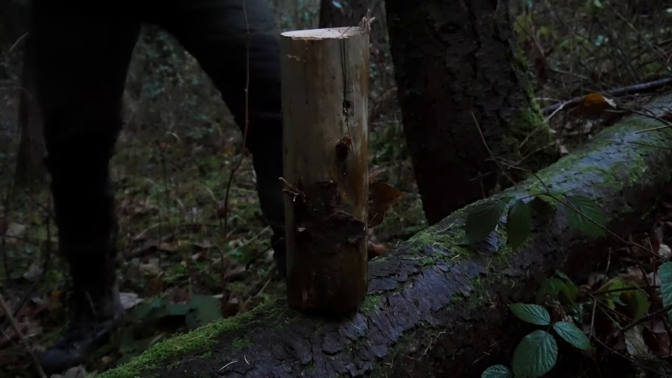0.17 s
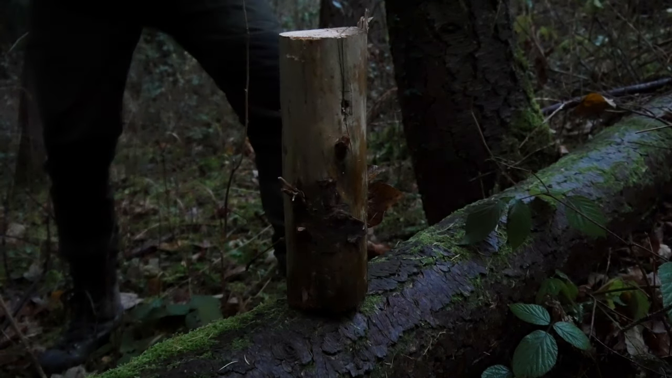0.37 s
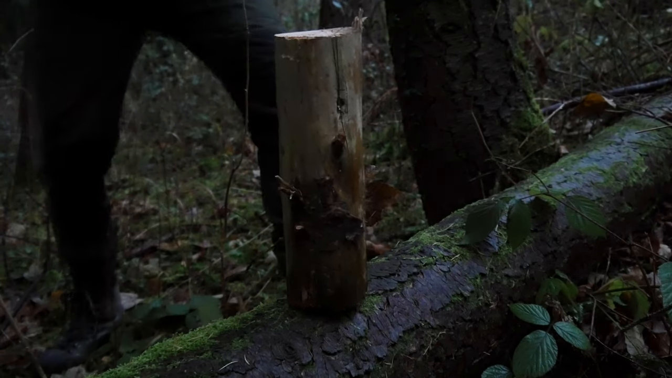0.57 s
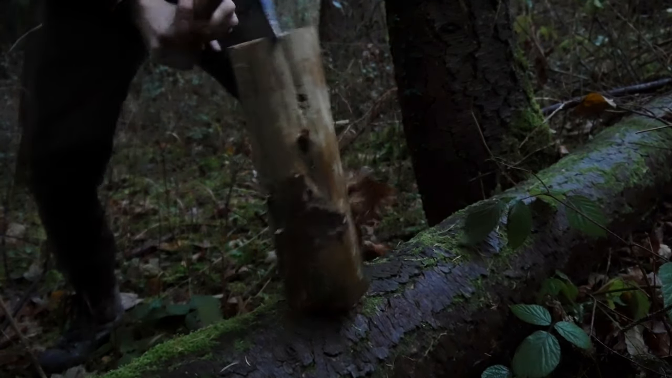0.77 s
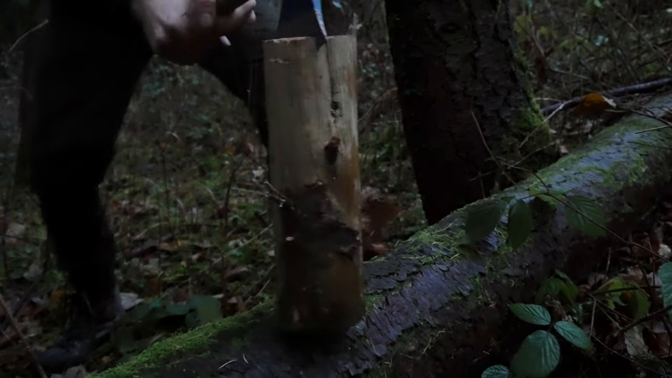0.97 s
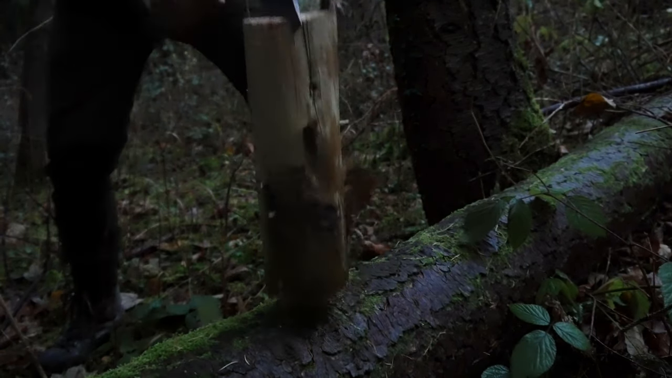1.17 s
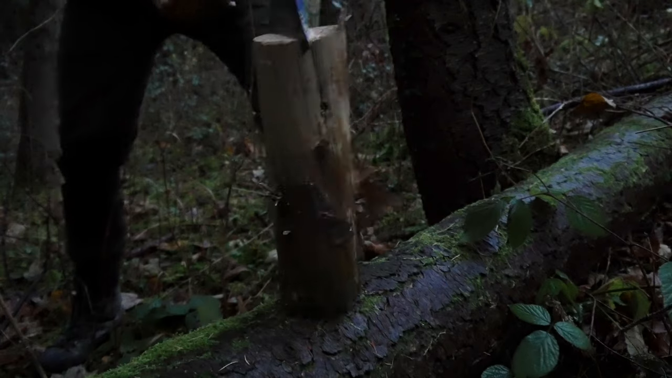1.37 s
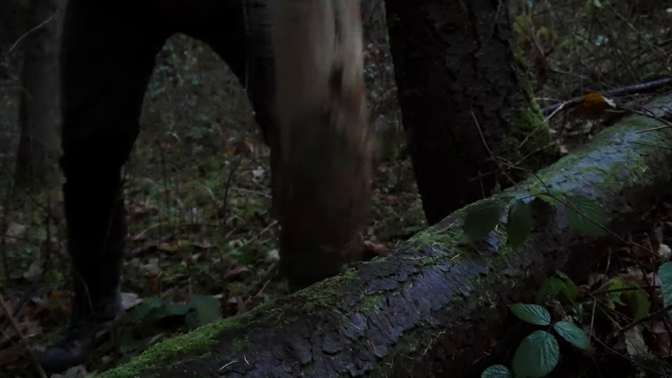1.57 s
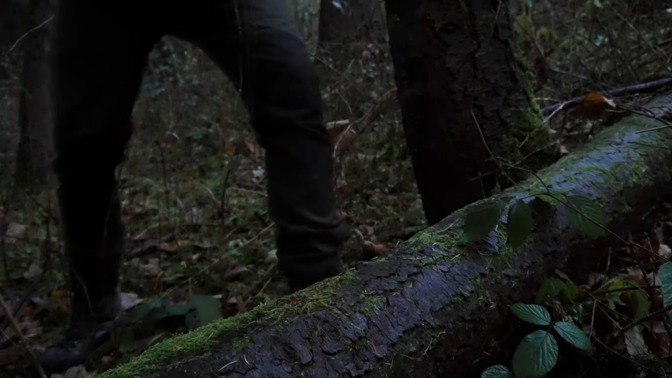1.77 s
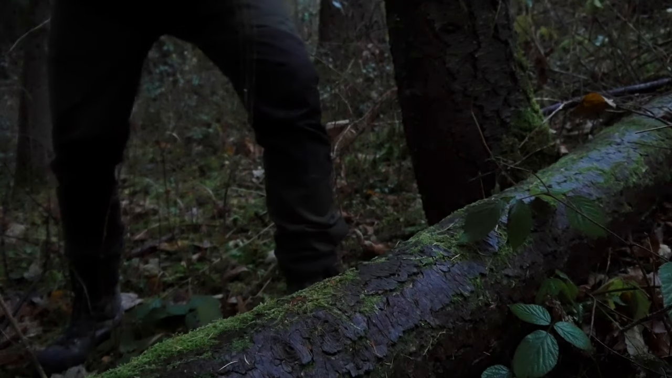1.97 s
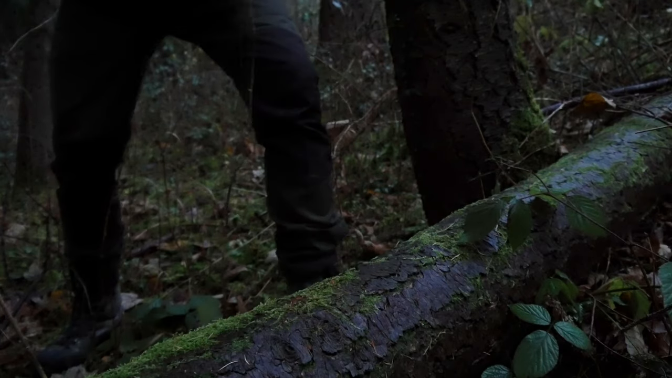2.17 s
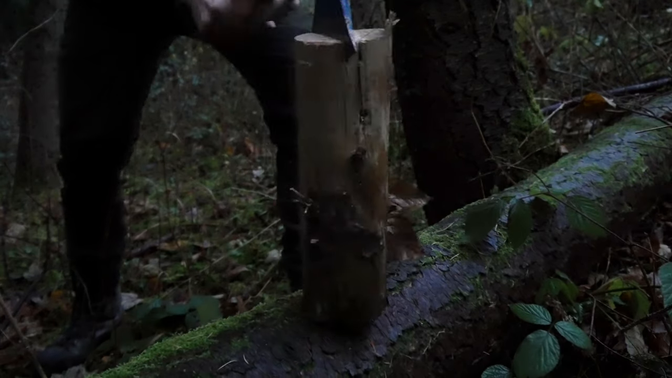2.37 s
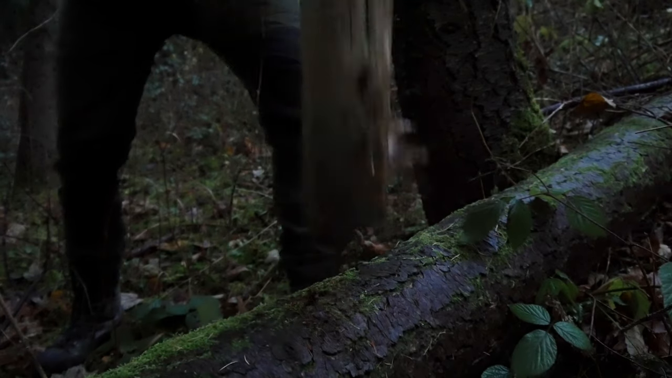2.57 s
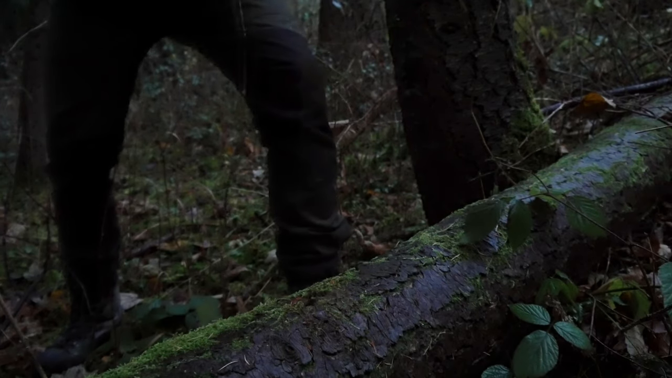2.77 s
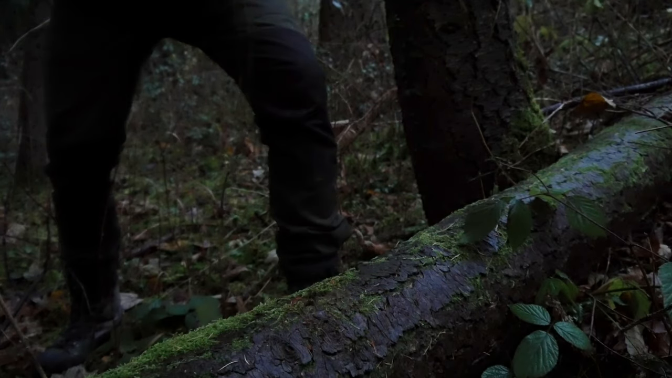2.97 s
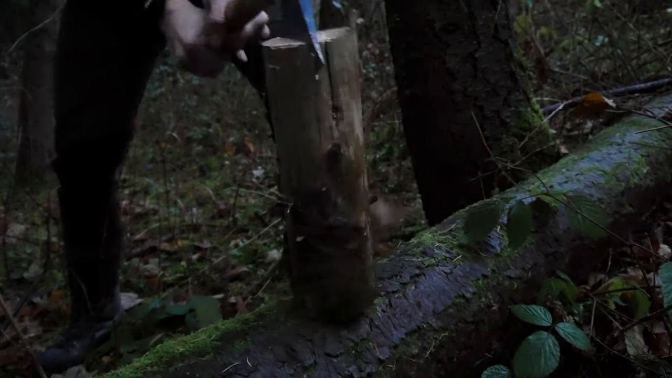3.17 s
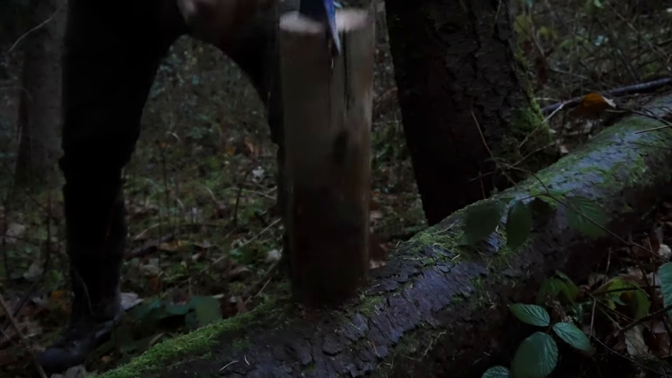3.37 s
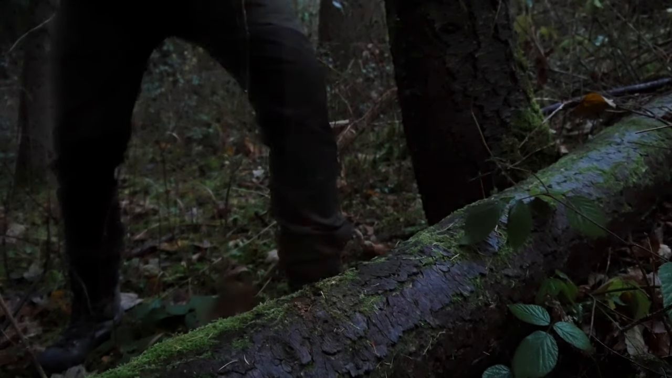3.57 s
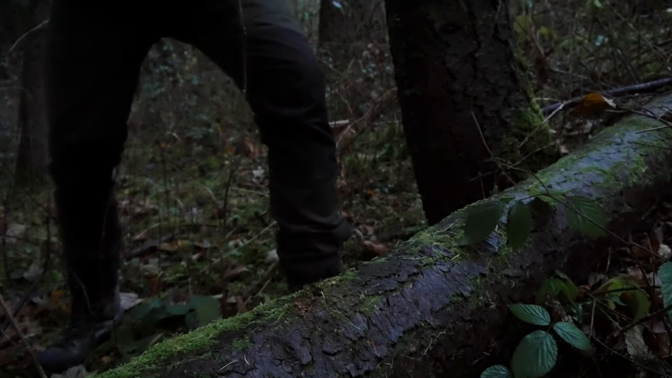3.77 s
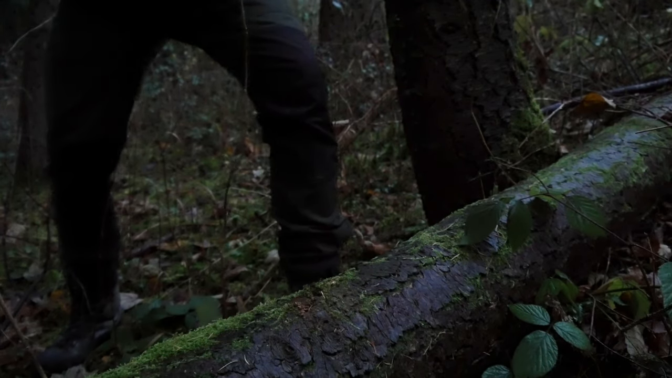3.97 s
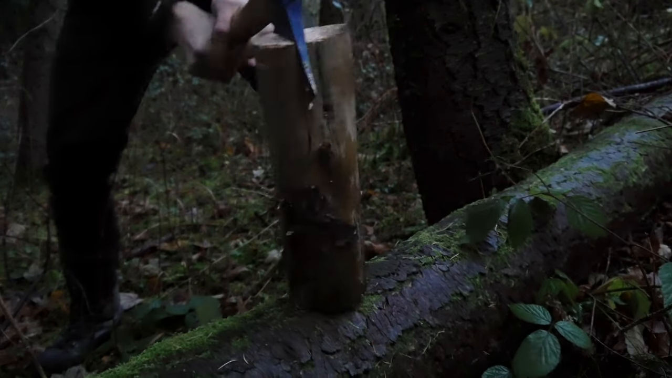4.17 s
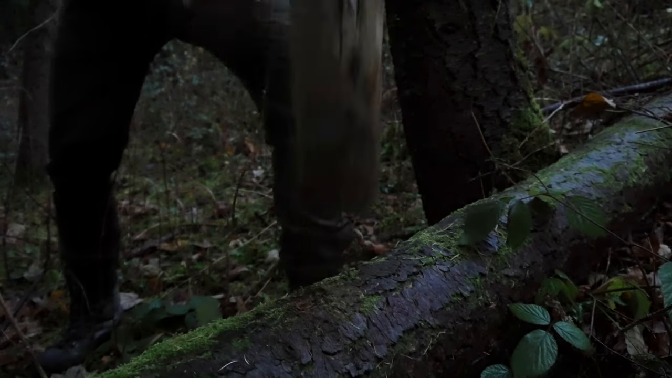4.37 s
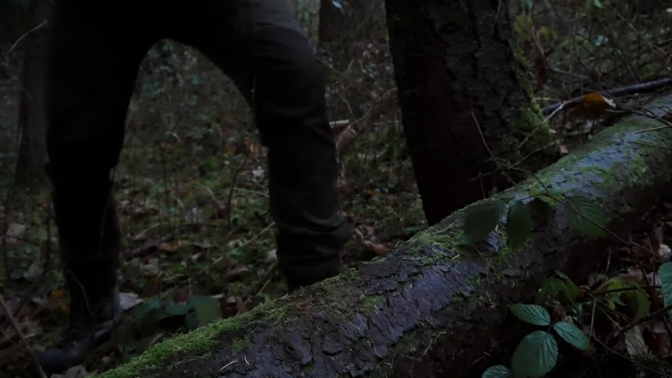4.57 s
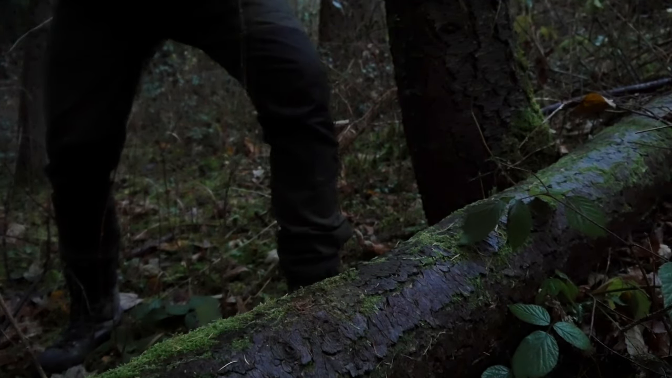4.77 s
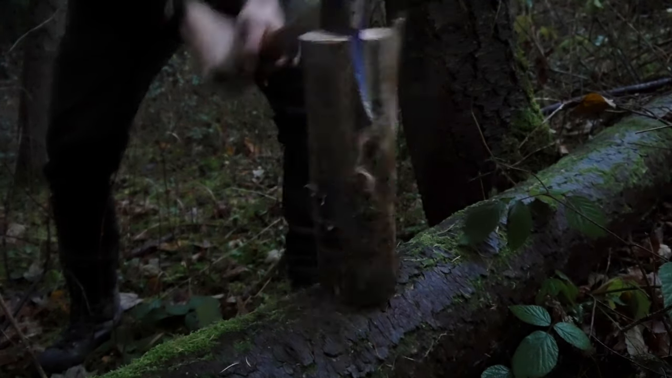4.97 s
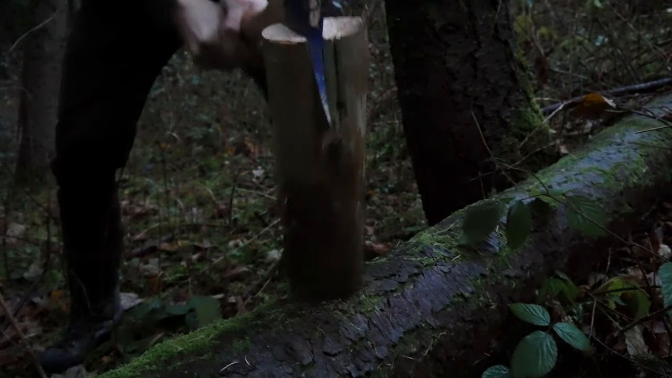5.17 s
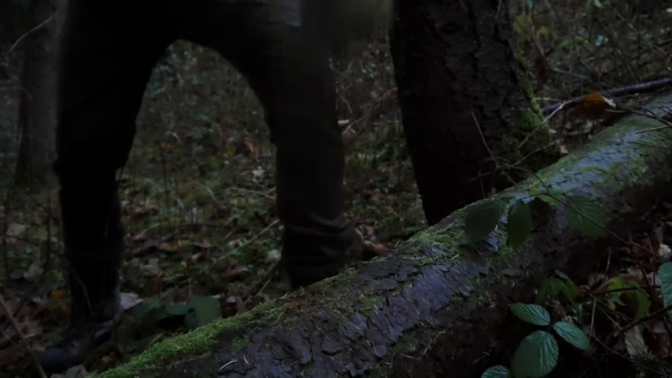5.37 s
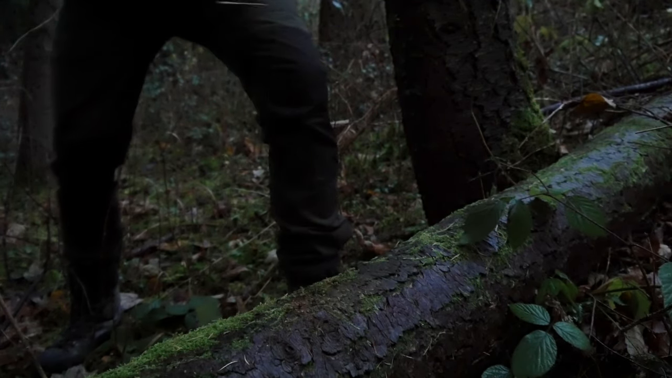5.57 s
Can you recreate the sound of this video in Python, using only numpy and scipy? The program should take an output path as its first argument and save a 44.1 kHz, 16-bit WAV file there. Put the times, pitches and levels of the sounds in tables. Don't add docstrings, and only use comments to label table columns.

```python
import sys
import numpy as np
from scipy import signal
from scipy.io import wavfile
from scipy.ndimage import uniform_filter1d

SR = 44100
rng = np.random.default_rng(int(sys.argv[2]) if len(sys.argv) > 2 else 0)


def transcribe(u):
    v = np.clip(np.atleast_2d(u).T, -1, 1)
    q = np.round(v * 32767).astype(np.int16)
    wavfile.write(sys.argv[1], SR, q)


def voltage_ratio(decibels):
    exponent = np.asarray(decibels, float) / 20
    return 10 ** exponent


N = 247842

# start in seconds, then levels in dB of the thump,
# the log modes, the returning wave and the forest tail.
BLOW_EVENTS = [
    (0.7155, -30, -21.5, -26.5, -18),
    (1.3640, -35, -41, -55, -39),
    (2.2597, -1, -15.5, -13, -24),
    (3.1356, 0, -12, -9.5, -19),
    (4.0594, -2, -14.5, -15, -15.5),
    (4.9606, -3, -14.5, -13, -17),
]


def curve(points, hz, column=1):
    points = np.array(points)
    return np.interp(np.log(hz), np.log(points[:, 0]), points[:, column])


def rms_one(x):
    return x / np.sqrt(np.mean(x ** 2) + 1e-20)


def drift(rate):
    knots = rng.standard_normal(int(N / SR * 40) + 2)
    return np.interp(np.arange(N) / SR * rate, np.arange(len(knots)), knots)


def filtered(x, order, hz, kind="low"):
    return signal.sosfilt(signal.butter(order, hz, kind, fs=SR, output="sos"), x)


def ring(x, hz, t60):
    radius = voltage_ratio(-60 / (t60 * SR))
    angle = 2 * np.pi * hz / SR
    poles = [1, -2 * radius * np.cos(angle), radius * radius]
    return signal.lfilter([0, np.sin(angle)], poles, x + 1e-18)


def add(out, s, piece):
    i = round(s * SR)
    out[..., i:i + piece.shape[-1]] += piece[..., :N - i]


def bands(length, alike_of):
    edges = 22 * 2 ** np.arange(0, 9.7, 1 / 3)
    white = rng.standard_normal((2, 2, length))
    for k, (low, high) in enumerate(zip(edges, edges[1:])):
        centre = np.sqrt(low * high)
        mid, side = filtered(white[k % 2], 2, [low, high], "band")
        alike = np.clip(alike_of(centre), 0, 1)
        yield centre, np.sqrt(1 + alike) * mid + np.sqrt(1 - alike) * side * [[1], [-1]]


def swish():
    # time of the blow in seconds, level at its end in dB.
    swings = [
        (0.71, -52),
        (2.258, -52),
        (3.134, -51.5),
        (4.06, -50.5),
        (4.958, -53),
    ]
    # centre in seconds, half length in seconds, level in dB.
    lifts = [
        (0.0, 0.074, -55.5),
        (0.298, 0.17, -57),
        (0.94, 0.22, -55),
        (1.826, 0.12, -62.5),
        (2.6, 0.19, -57.5),
        (3.386, 0.18, -58),
        (3.71, 0.11, -58),
        (4.324, 0.28, -58),
        (4.588, 0.11, -70),
        (5.293, 0.42, -62.5),
    ]
    rest_db, rise_db_per_s, settle_db_per_s = -66, 98, 104
    t = np.arange(N) / SR
    power = voltage_ratio(rest_db) ** 2
    for s, db in swings:
        below_db = np.where(t < s, rise_db_per_s * (s - t), settle_db_per_s * (t - s))
        power = power + voltage_ratio(db - below_db) ** 2
    for s, half_s, db in lifts:
        power = power + voltage_ratio(db) ** 2 * np.exp(-((t - s) / half_s) ** 2)
    return np.sqrt(power)


def background():
    # frequency in Hz, density in dB per Hz.
    air_spectrum = [(20, -12), (45, -12), (75, -1.5), (150, 0), (300, -1), (500, 0.1), (800, -0.5),
                    (1400, -7.5), (2200, -21), (4000, -22.5), (8000, -27.5), (13000, -30.5), (16000, -55)]
    # frequency in Hz, density in dB per Hz.
    cloth_spectrum = [(500, -48), (1000, 9.5), (2000, 6), (4000, 3), (7000, 0.5), (10000, -4), (14000, -11),
                      (17000, -47)]
    # frequency in Hz, left-right likeness from 0 to 1.
    likeness = [(60, 1), (180, 0.46), (550, 0.64), (1650, 0.57), (4970, 0.86), (15000, 0.79)]
    air_db, cloth_db, flicker_db = -51, 6.5, 1.5
    air = cloth = 0
    for hz, band in bands(N, lambda hz: curve(likeness, hz)):
        air = air + voltage_ratio(curve(air_spectrum, hz) + flicker_db * drift(6)) * band
        cloth = cloth + voltage_ratio(curve(cloth_spectrum, hz) + flicker_db * drift(12)) * band[:, ::-1]
    return voltage_ratio(air_db) * rms_one(air) + voltage_ratio(cloth_db) * swish() * rms_one(cloth)


def clearing(hit):
    delay_s, rise_s, t60_s = 0.21, 0.15, 2.1
    late = np.arange(SR) / SR - delay_s
    swell = voltage_ratio(-60 * np.maximum(late, 0) / t60_s) / (1 + np.exp(-late / rise_s * 4))
    mid, side = rng.standard_normal((2, SR))
    scatter = swell * (mid + 0.5 * side * [[1], [-1]]) / np.sqrt(SR / 2)
    middle = filtered(hit, 5, [388, 2020], "band")
    middle = middle - 0.87 * signal.lfilter(*signal.iirpeak(1053, 1.1, fs=SR), middle)
    return voltage_ratio(-13) * signal.fftconvolve(middle[None], scatter, axes=1)[:, :N]


def forest():
    # frequency in Hz, level in dB, t60 in seconds.
    tail_bands = [(200, -22, 0.19), (457, 0, 0.34), (900, -6, 0.19), (1700, -3.5, 0.15),
                  (3000, -6.5, 0.066), (6000, -4.5, 0.08), (10900, -9.5, 0.067), (16000, -36, .04)]
    out, t = np.zeros((2, N)), np.arange(SR // 4) / SR
    for s, *_, tail_db in BLOW_EVENTS:
        tail = 0
        for hz, band in bands(len(t), lambda hz: 0.5):
            if hz > 150:
                decay_db = 60 * t / curve(tail_bands, hz, column=2)
                tail = tail + voltage_ratio(curve(tail_bands, hz) - decay_db) * band
        add(out, s + 0.003, voltage_ratio(tail_db) * tail * np.minimum(t / 0.0017, 1))
    return out


def ticks():
    # start in seconds, ring level in dB, frequency in Hz, snap level in dB.
    bark_ticks = [(1.117, -41, 7060, -50), (1.229, -41, 3920, -53), (1.2482, -44, 6000, -35),
                  (1.4137, -39, 3250, -47), (1.4190, -42, 3200, -54), (2.408, -44, 3800, -43),
                  (2.4140, -50, 10040, -39), (2.695, -48, 4200, -41), (2.7385, -39, 3560, -34),
                  (2.8984, -47, 4700, -39.5), (3.123, -26, 3370, -26), (3.1274, -33, 3000, -42),
                  (3.2292, -32, 2750, -45), (3.419, -34, 2570, -40), (3.6960, -36, 2550, -39),
                  (3.752, -34, 2300, -36), (3.8143, -37, 2290, -37), (4.3525, -35, 9700, -35),
                  (4.9183, -38, 10300, -53), (5.0360, -52, 2700, -35.5), (5.232, -37, 5500, -59),
                  (5.2690, -36, 3120, -32.5), (5.3476, -32, 3370, -34), (5.3640, -44, 4720, -41),
                  (5.3880, -37, 3620, -51), (5.3946, -36, 2800, -38.5), (5.445, -40, 2550, -37),
                  (5.4525, -40, 10500, -57.5)]
    # start in seconds, ring level in dB, frequency in Hz, snap level in dB,
    # t60 in milliseconds.
    clinks = [
        (1.6423, -22.5, 2800, -32.5, 3.3),
        (1.6445, -32, 2140, -39, 6),
        (1.6492, -33.5, 2840, -47, 7.8),
        (4.4677, -18.5, 11900, -21.5, 16),
        (4.4694, -30, 6700, -49, 42),
        (4.4675, -25, 14100, -37, 8),
        (4.4679, -30, 2450, -25, 6.5),
        (4.5028, -42, 4600, -40, 15),
    ]
    bark_t60_ms = 3.5
    out, t = np.zeros((2, N)), np.arange(SR // 15) / SR
    events = [*[(*row, bark_t60_ms) for row in bark_ticks], *clinks]
    for s, ring_db, hz, snap_db, t60_ms in events:
        noise = rng.standard_normal(len(t)) * np.exp(-t / 0.0016)
        snap = filtered(noise, 2, [1600, 9000], "band")
        tone = ring(snap * np.exp(-t / 0.00014), hz, t60_ms / 1000)
        tick = voltage_ratio(ring_db) * tone / np.abs(tone).max() + voltage_ratio(snap_db) * snap / np.abs(snap).max()
        pan_db = rng.normal(0, 1.5) * np.array([[1], [-1]])
        add(out, s, voltage_ratio(pan_db) * tick)
    return out


def tearing():
    # start in seconds, level in dB, length in milliseconds, knock level in dB.
    tears = [(0.7142, 0, 2.9, 0.5), (.7160, -14, 1, -4.5), (0.721, -13, 0.79, -5), (1.359, -38.5, 5.1, -60),
             (2.2608, -5, 2.77, -1), (2.2643, -18, 3, -17), (3.1359, -5, 2.7, -24), (3.1385, -5.5, 2.8, 1),
             (4.0603, 3, 1.18, 7.5), (4.0633, 4.5, 0.87, -4), (4.0645, -33, 1.3, 5),
             (4.9609, -5, 2.06, 6.5), (4.9620, -16, 1.6, -15), (4.9640, -8.5, 3.2, -18)]
    # frequency in Hz, level in dB, t60 in seconds.
    round_modes = [(1470, -3, .009), (1740, -3, .009), (2040, -4, .008), (2600, -6, .006), (3400, -4, .006),
                   (4650, -5, .005), (6200, -7, .004)]
    out, t = np.zeros(N), np.arange(SR // 20) / SR
    for s, db, length_ms, knock_db in tears:
        snaps = rng.standard_normal(len(t)) * voltage_ratio(2.5 * rng.exponential(1, len(t)) - 2.5)
        shape = np.exp(-(t * 1000 / length_ms) ** 2) + 0.017 * np.exp(-t / 0.0037)
        volley = snaps * shape * np.minimum(t / 0.0002, 1)
        strengths = voltage_ratio(rng.normal(0, 2.5, len(round_modes)))
        body = 0
        for strength, (hz, mode_db, t60) in zip(strengths, round_modes):
            body = body + strength * voltage_ratio(mode_db) * ring(volley, hz, t60)
        crack = filtered(volley, 1, [1600, 11000], "band")
        add(out, s, voltage_ratio(db) * crack + voltage_ratio(knock_db) * body / np.abs(body).max())
    return out


def returning_wave(t):
    # delay in milliseconds, frequency in Hz, level in dB,
    # rise in milliseconds, fall in milliseconds.
    returns = [
        (21.23, 410, -2, 9.2, 2),
        (31.55, 450, -6.5, 0.72, 2.1),
        (52.46, 360, -21.5, 3.3, 7.1),
        (80.4, 340, -25.5, 2.6, 5.7),
    ]
    glide_hz_per_ms = -5
    wave = 0
    for delay_ms, hz, db, rise_ms, fall_ms in returns:
        late = t * 1000 - delay_ms
        swell = 1 / (np.exp(-late / rise_ms) + np.exp(np.minimum(late / fall_ms, 50)))
        phase = 2 * np.pi * (hz + glide_hz_per_ms * late / 2) * late / 1000
        wave = wave + 2 * voltage_ratio(db) * swell * np.cos(phase)
    return wave


def blows():
    # frequency in Hz, level in dB, t60 in seconds.
    log_modes = [(124.8, -14, 0.21), (160, -18, 0.21), (186, -10.5, 0.12), (189, -23, 0.069),
                 (227.5, -0.5, 0.11), (281, -3, 0.17), (294, -25, 0.028), (366.5, 6.5, 0.055),
                 (384.4, -24.5, 0.44), (434, -19.5, 0.33), (535, -27, 0.087)]
    # frequency in Hz, level in dB, t60 in seconds.
    steel_modes = [(1390, -10, .018), (1810, -8, .018)]
    # start in seconds, level in dB, frequency in Hz, cycles of ring.
    knocks = [(0.714, -8.5, 1230, 24), (.7146, -2, 2100, 22), (.7148, -5, 900, 14.4),
              (0.7154, -2.5, 4880, 36), (.7165, -5.5, 1440, 18), (0.7144, -8, 1520, 7.3),
              (1.3650, -23.5, 380, 6.7), (1.3760, -38, 178, 10), (1.384, -31, 123, 8.5),
              (1.643, -35, 1600, 9.6), (1.643, -36, 1050, 3), (2.2601, 4, 1540, 2.3), (2.26, -4.5, 724, 20),
              (2.2614, -9.5, 2760, 12), (3.1362, 0.5, 792, 13), (3.1372, -10, 3570, 48),
              (4.0604, 4.3, 500, 5.7), (4.0623, -9, 3000, 24), (4.9602, -1.5, 1200, 3.4),
              (4.9612, 8, 526, 3.3), (4.9629, -10, 1700, 54), (4.9622, -1.5, 900, 12),
              (4.9633, -1, 3290, 36)]
    steel_below_log_db = 28.5
    out, t = np.zeros(N), np.arange(SR // 3) / SR
    click = 1.0 * (t == 0)
    soft = filtered(click, 2, 900)
    thump = ring(soft, 305, 0.037) + 0.23 * ring(soft, 330, 0.0046)
    modes = np.array([(-1) ** k * voltage_ratio(db) * ring(soft, hz, t60)
                      for k, (hz, db, t60) in enumerate(log_modes)])
    modes = modes * (1 - np.exp(-t / 0.0081))
    wave = returning_wave(t)
    for s, thump_db, log_db, wave_db, _ in BLOW_EVENTS:
        add(out, s + 0.00089, voltage_ratio(thump_db) * thump)
        chatter = 0.41 * rng.standard_normal(len(t)) * np.exp(-t / 0.1)
        steel = sum(voltage_ratio(db) * ring(chatter, hz, t60) for hz, db, t60 in steel_modes)
        landing = voltage_ratio(rng.normal(0, 3, len(log_modes)))
        add(out, s, voltage_ratio(log_db) * landing @ modes)
        add(out, s, voltage_ratio(wave_db) * wave)
        add(out, s, voltage_ratio(log_db - steel_below_log_db) * steel)
    for s, db, hz, cycles in knocks:
        add(out, s, voltage_ratio(db) * ring(click, hz, cycles / hz))
    return out


def scene():
    hit = blows() + filtered(tearing(), 4, 12500)
    hit = filtered(hit, 4, 130, "high")
    echoes = np.roll(hit, 25) - np.roll(hit, 70)
    smear = voltage_ratio(-20) * filtered(echoes, 1, 12000)
    direct = hit + smear * [[1], [-1]]
    return direct + forest() + clearing(hit) + ticks() + filtered(background(), 8, 15200)


def top_cut(x):
    return signal.sosfilt(signal.butter(12, 16430, fs=SR, output="sos"), x)


def record(dry):
    duck_db, recover_s = 4, 0.29
    x = dry - 0.6 * signal.lfilter(*signal.iirpeak(7850, 30.0, fs=SR), dry)
    x = x + 0.5 * signal.lfilter(*signal.iirpeak(10500, 4.0, fs=SR), x)
    loud = 1.0 * (np.abs(x).max(axis=0) > 0.8)
    over = uniform_filter1d(loud, size=400, origin=199) > 0
    hold = np.exp(-1 / (recover_s * SR))
    duck = np.minimum(signal.lfilter([0.004], [1, -hold], over), 1)
    x = x * voltage_ratio(-duck_db * duck)
    x = x / (1 + np.abs(x) ** 8) ** (1 / 8)
    x = filtered(x, 2, 35, "high")
    return top_cut(x)


dry = scene()
out = record(dry)
transcribe(out)
```